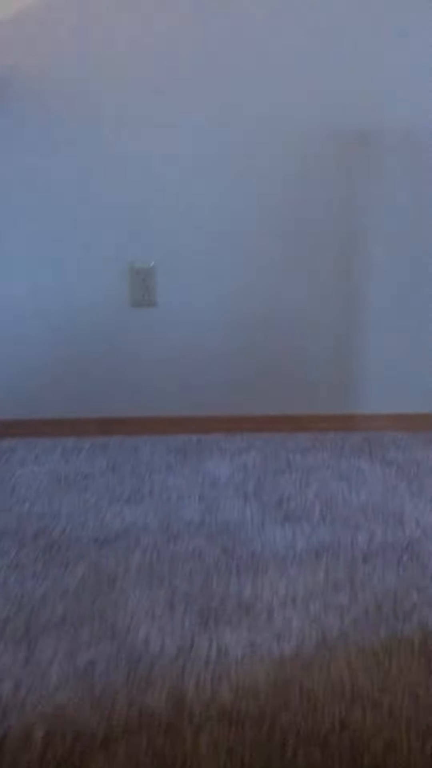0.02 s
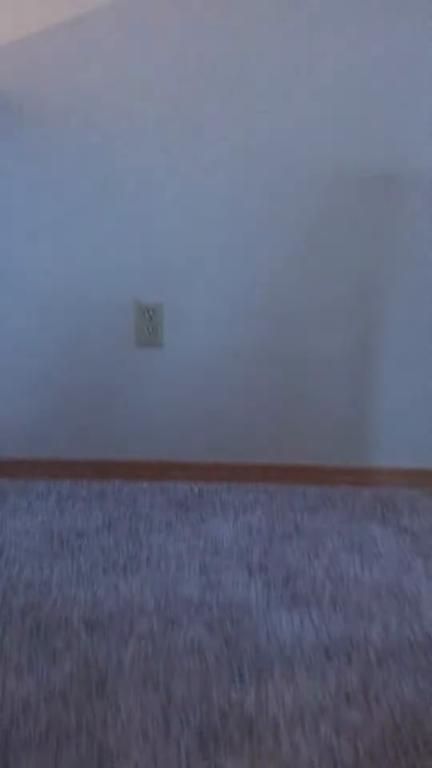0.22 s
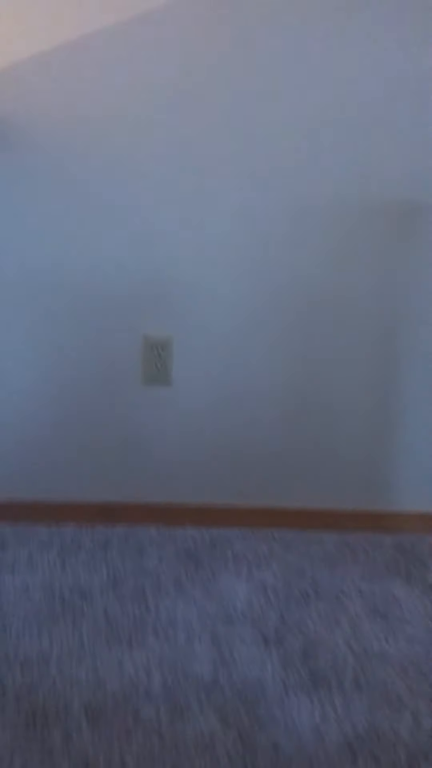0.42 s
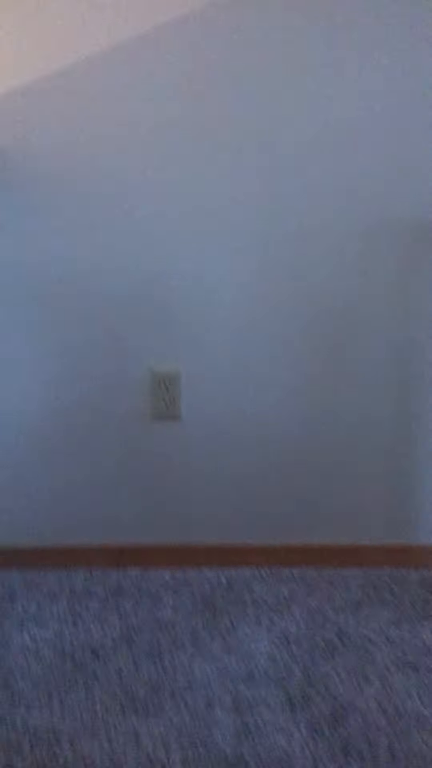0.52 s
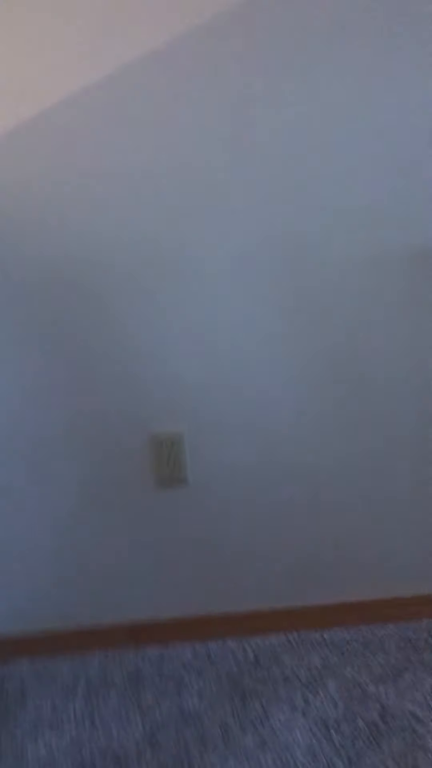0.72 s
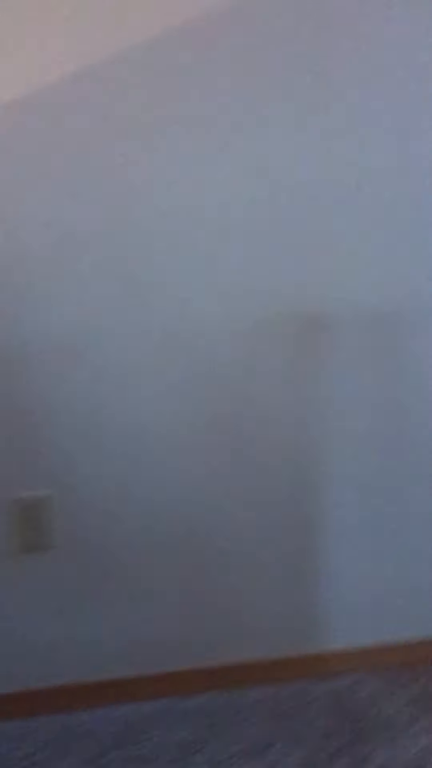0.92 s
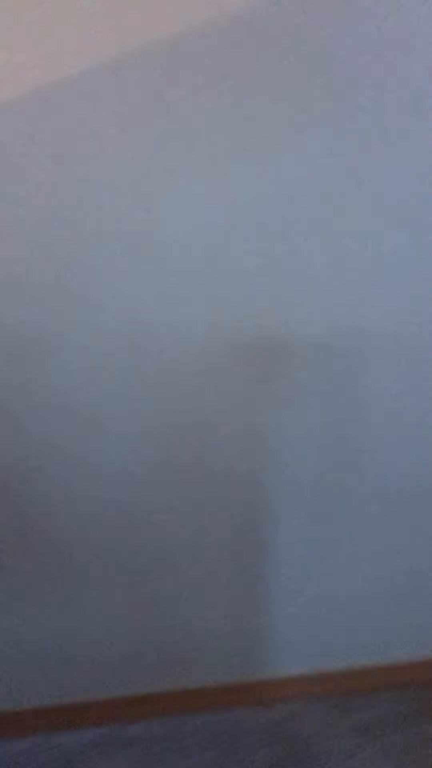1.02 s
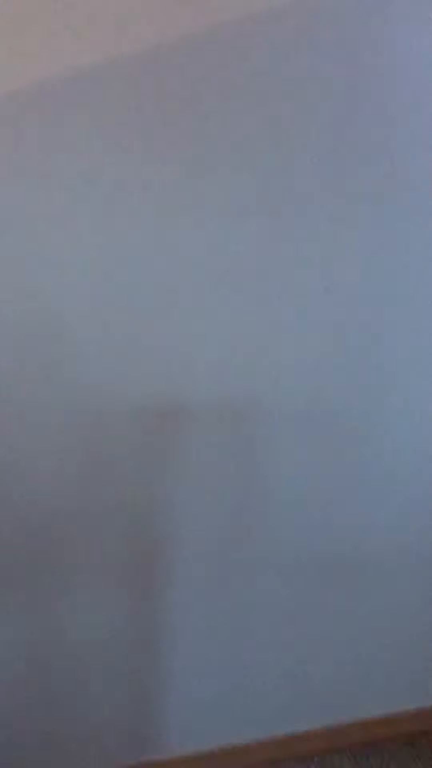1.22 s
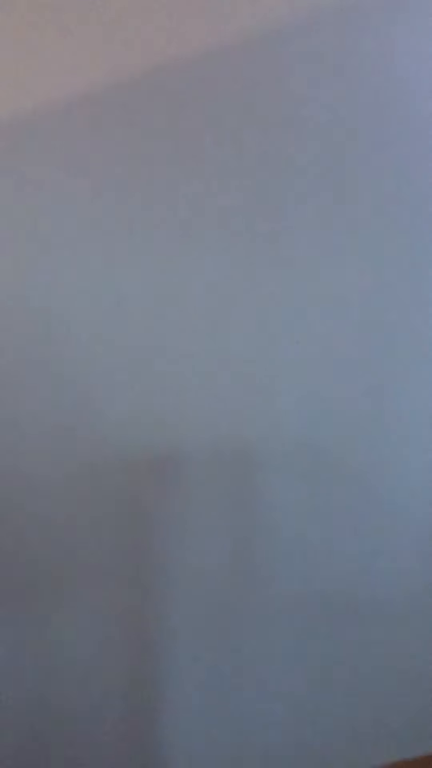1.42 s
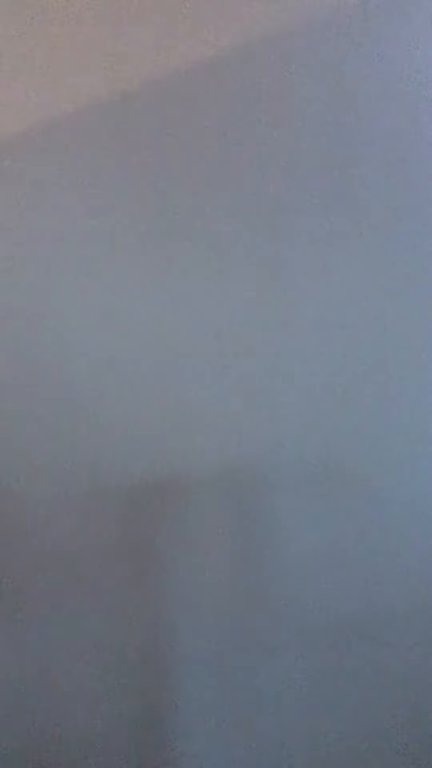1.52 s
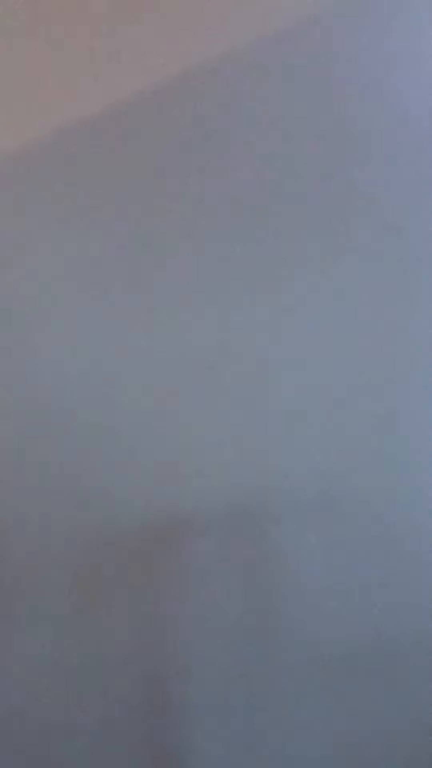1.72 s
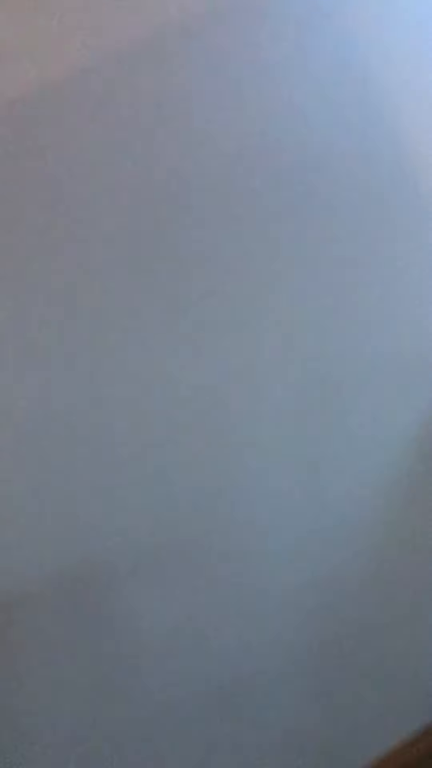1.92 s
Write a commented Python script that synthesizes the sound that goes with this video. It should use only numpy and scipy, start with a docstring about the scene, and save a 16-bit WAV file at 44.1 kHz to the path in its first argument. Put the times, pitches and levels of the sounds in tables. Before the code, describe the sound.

Four soft, dull footsteps on a carpeted wooden floor, with faint cloth rustle and small crackles.

```python
"""Quiet crackles, cloth rustle and a low house noise are heard first; then come four soft footfalls
on a carpeted wooden landing, close to the microphone. Each footfall swells damped board modes and leaves
a low shudder of noise; slaps on the pile are short knocks with brushes of noise. Soles and clothes tick
as noise bursts through resonances, weight shifts on the boards as low swings, and a small room answers."""
import sys
import numpy as np
from scipy import signal
from scipy.fft import rfft, irfft, next_fast_len
from scipy.io import wavfile
from scipy.ndimage import map_coordinates

SR = 44100
rng = np.random.default_rng(int(sys.argv[2]) if len(sys.argv) > 2 else 0)


def output_pcm(signal):
    """Save a mono or channel-first signal as 16-bit PCM at the path in sys.argv[1].

    Samples are clipped to [-1, 1] before scaling.
    """
    pcm = np.clip(np.atleast_2d(signal).T, -1, 1) * 32767
    wavfile.write(sys.argv[1], SR, np.round(pcm).astype(np.int16))


N = 88200
T = np.arange(N) / SR  # seconds


def amp(db):
    """Decibel law: a level in dB becomes an amplitude ratio."""
    return 10 ** (np.asarray(db) / 20)


def unit(x):
    """Normalisation by mean power: x scaled to rms 1."""
    return x / np.sqrt(np.mean(x ** 2) + 1e-20)


def along(points, hz):
    """Logarithmic frequency scale: (Hz, value) points joined by straight lines on it."""
    point_hz, value = np.transpose(points)
    return np.interp(np.log(hz + 1), np.log(point_hz + 1), value)


def filtered(x, response):
    """Linear filtering: the spectrum of x is multiplied by a response of frequency."""
    size = next_fast_len(len(x) + 8192)
    spectrum = rfft(x, size) * response(np.fft.rfftfreq(size, 1 / SR))
    return irfft(spectrum, size)[:len(x)]


def noise(spectrum):
    """Spectral shaping: white noise is coloured by (Hz, dB) points and set to rms 1."""
    points = [(5, -120)] + list(spectrum)
    return unit(filtered(rng.standard_normal(N), lambda hz: amp(along(points, hz))))


def wobble(rate):
    """Slow random modulation: a smooth curve through rate random knots a second."""
    knots = rng.standard_normal(int(N * rate / SR) + 4)
    return map_coordinates(knots, [T * rate])


def swell(start, rise, t60):
    """Build-up and decay: a smooth rise in seconds, then an exponential fall of 60 dB in t60 seconds."""
    u = np.clip(T - start, 0, None)
    attack = np.sin(np.pi / 2 * np.minimum(u / rise, 1)) ** 1.4
    return attack * amp(-60 * np.clip(u - rise, 0, None) / t60)


# Spectrum of the quiet house. Each row: frequency in Hz, relative density in dB per Hz.
HOUSE_SPECTRUM = [(13, -18), (22, 8), (143, -0.5), (222, -13), (418, -23), (480, -28), (981, -28),
                  (1070, -28), (2240, -29.5), (5260, -33.5), (14500, -40.5), (15800, -72)]


def house():
    """Stationary background noise: a steady random signal weighted towards low frequencies."""
    return amp(-54) * noise(HOUSE_SPECTRUM)


# Movement of cloth and pile. Each row: time in seconds, level in dB before the cloth trim.
CLOTH_LEVELS = [(0, -53), (.04, -58), (.13, -57.5), (.2, -71), (.4, -65.5), (.5, -63.5), (.6, -62.5),
                (.72, -61.5), (.8, -60), (.88, -55.5), (.96, -64), (1.1, -77), (1.2, -64.5), (1.3, -79),
                (1.4, -58), (1.47, -87), (1.58, -61.5), (1.7, -68), (1.8, -66), (1.9, -78), (2, -63)]
# Colour of the cloth. Each row: frequency in Hz, relative density in dB per Hz.
CLOTH_SPECTRUM = [(600, -26), (1500, -12.5), (3200, -3.5), (5000, -15.5), (7000, -9), (10000, -18)]
# A dull rush in the low middle. Each row: time in seconds, level in dB before its wobble.
RUSH_LEVELS = [(0, -56.5), (.06, -70), (.2, -64), (.36, -73), (.55, -68), (.72, -67.5), (.85, -69.5),
               (1.0, -73.5), (1.15, -70.5), (1.3, -64), (1.4, -88), (1.6, -75), (1.72, -66), (1.85, -63.5),
               (2, -68.5)]
# Colour of the dull rush. Each row: frequency in Hz, relative density in dB per Hz.
RUSH_SPECTRUM = [(120, -27), (200, -7.5), (260, -9.5), (335, -0.5), (450, -11), (900, -15), (1500, -13.5),
                 (2500, -33.5)]
CLOTH_TRIM_DB, GRAIN_DB = -7.5, 2


def rustle():
    """Amplitude modulation of noise: grainy cloth follows the movement, over a duller rush."""
    def level(rows):
        return amp(np.interp(T, *np.transpose(rows)))

    grain = amp(GRAIN_DB * wobble(160) + 2.3 * wobble(25.57))
    cloth = amp(CLOTH_TRIM_DB) * unit(grain * noise(CLOTH_SPECTRUM))
    rush = amp(2 * wobble(21)) * noise(RUSH_SPECTRUM)
    return level(CLOTH_LEVELS) * cloth + level(RUSH_LEVELS) * rush


# Small crackles of soles and clothes. Each row: start in seconds, level in dB before the length scaling,
# resonance in Hz, broad share in dB, bright share in dB (both against the resonance), decay constant in ms.
CRACKLES = [(0.045, -46, 3240, 0, -34, 6.3), (0.057, -47, 3220, -12, -30, 4.9),
            (.066, -47, 3180, 4, -22, 2.7), (0.085, -49, 3540, -5, -24, 1.7),
            (0.1073, -42.5, 2370, -2, -28, 1.6), (0.351, -36, 2900, 26, -3, 1.47),
            (.372, -47, 3660, 0, -12, 0.77), (0.4534, -39.5, 4100, 7, -38, 1.86),
            (0.502, -50, 2960, -17, -33, 1.1), (.563, -51, 2950, -14, -28, 3),
            (.585, -47.5, 3130, -15, -33, 3.1), (.592, -42, 3050, -13, -16, 2.1),
            (.599, -49, 2900, -4, -23, 1.4), (0.61, -42, 2050, -15, -28, 1.2),
            (.6215, -36.5, 4130, -7, -42, 3), (.630, -44, 3900, 12, -28, 1.2),
            (0.6366, -36.5, 5240, 2, -15, .9), (0.644, -48, 4500, -14, -13, 0.75),
            (.647, -59, 5300, -4, -30, 1.5), (0.801, -41.5, 3720, -9, 9, 2.1),
            (0.809, -37.5, 3720, 1, 13.5, 1.5), (0.858, -44, 3020, 11, -22, 3.7),
            (0.862, -42, 4500, 15, 19, 0.86), (.868, -44.5, 3520, -5, -31, 2.9),
            (0.875, -49.5, 3540, 1, -6, 3.1), (0.886, -38, 3660, -5, 25, 0.96),
            (0.895, -60, 3460, 3, -25, 2.4), (.905, -61, 3600, -9, 4, .7),
            (0.9411, -45.5, 2660, -8, -25, 2.3), (1.222, -50, 3960, 9, -18, 1.7),
            (1.226, -43, 3600, -5, 9, 1.3), (1.2545, -36, 1740, 10.5, 10, 1.6),
            (1.260, -37.5, 6040, 4, 8, 1.6), (1.2649, -50, 2900, -8, -5, 0.67),
            (1.275, -58, 3500, -15, -17, 3.3), (1.3447, -40.5, 4300, 3, -24, 1.7),
            (1.3504, -36, 6600, 6, 6, 1.53), (1.356, -52, 2420, 0, -5.5, 2.3),
            (1.411, -62, 3200, -17, -25, 4.6), (1.516, -53, 2740, -1, -28, 5.4),
            (1.523, -51.5, 2980, 5, -18, 2.5), (1.548, -46.5, 2340, -8, -28, 3.2),
            (1.5522, -37.5, 2300, 9, -22, .7), (1.560, -53.5, 2200, 0, -22, 6.3),
            (1.5638, -42, 2270, 3, -16, 2.1), (1.572, -65, 2080, -8, -28, 2.2),
            (1.619, -52, 3880, -9, -26, 1.1), (1.623, -44, 3550, -8, -22, .6),
            (1.809, -56.5, 4400, -22, -37, 3), (1.876, -58.5, 3250, -10, -30, 8.8),
            (1.889, -47, 3650, -23, 1.5, 9), (1.905, -51, 3440, -16, -34, 12),
            (1.919, -54, 3440, -6, -13, 6.2), (1.935, -64, 3700, -12, -30, 4.6),
            (1.969, -52, 2730, -9, -21, 3.4)]
TICK_Q, LOW_HZ, HIGH_HZ, BRIGHT_HZ = 2.82, 1200, 5560, 7400
TRAIL_DB, TRAIL_S, TRAIL_SHARE = -12, 0.007, 0.03  # fine grains that follow a crackle
TICK_RISE_MS, UNEVEN_DB = 0.2, 2  # soft edge; random colour of each crackle


def unit_energy(x):
    """Normalisation by energy: the squares of x sum to 1."""
    return x / np.linalg.norm(x)


def ticks():
    """Resonance excited by a transient: a dying noise burst, with a broad and a bright share."""
    out, t = np.zeros(N + 2048), np.arange(2048) / SR
    jf = 1j * np.fft.rfftfreq(len(t), 1 / SR)  # imaginary frequency in Hz
    broad = (jf / (LOW_HZ + jf)) ** 3 / (1 + jf / HIGH_HZ) ** 2
    bright = (jf / (BRIGHT_HZ + jf)) ** 4
    soft_edge = 1 - np.exp(-t * 1000 / TICK_RISE_MS)
    draws = rng.standard_normal((len(CRACKLES), 3, len(t)))
    for (s, db, hz, broad_db, bright_db, ms), (grit, grain, colour) in zip(CRACKLES, draws):
        # only the strongest few grains sound in the trail
        sparse = np.abs(grain) > np.quantile(np.abs(grain), 1 - TRAIL_SHARE)
        trail = amp(TRAIL_DB) * np.exp(-t / TRAIL_S) * sparse / np.sqrt(TRAIL_SHARE)
        decay = np.exp(-t * 1000 / max(ms, 0.1))
        burst = rfft(grit * (decay + trail) * soft_edge)
        burst = burst * amp(UNEVEN_DB * map_coordinates(colour, [jf.imag / 900]))  # a knot each 900 Hz
        damping = jf * hz / TICK_Q
        peak = (damping / (hz * hz + jf * jf + damping)) ** 2
        ring, wide, crisp = [unit_energy(irfft(burst * h)) for h in (peak, broad, bright)]
        crackle = unit_energy(ring + amp(broad_db) * wide + amp(bright_db) * crisp)
        # energy grows with length, so that the level does not depend on it
        out[round(s * SR):][:len(t)] += amp(db) * np.sqrt(ms * SR / 8000) * crackle
    return out[:N]


# Sole slapping the pile. Each row: knock centre in seconds, knock peak in dB, knock frequency in Hz,
# dull scuff in dB and bright brush in dB (both before their wobble), brush t60 in seconds.
PILE_SLAPS = [(0.2441, -29, 1280, -48, -53.5, 0.097), (0.664, -41.5, 1250, -53, -59.5, 0.11),
              (1.147, -49.5, 1130, -54, -61, 0.09), (1.183, -46.5, 1340, -60.5, -85, 0.041),
              (1.662, -67, 1400, -56.5, -66, 0.15)]
# Colour of the dull scuff. Each row: frequency in Hz, relative density in dB per Hz.
SCUFF_SPECTRUM = [(250, -23), (400, -6.5), (650, -3), (1100, -6), (1600, -5), (2300, -16), (4000, -15)]
# Colour of the bright brush. Each row: frequency in Hz, relative density in dB per Hz.
BRUSH_SPECTRUM = [(1000, -25), (2000, 8), (3500, 3), (6000, -2), (9000, -7.5), (15800, -17)]
SLAP_S, BRUSH_LEAD_S = 0.00088, 0.01


def slaps():
    """Impact and friction: a knock of about two cycles, and fibre noise around it, dull and bright."""
    knock, scuff_level, brush_level = np.zeros(N), np.zeros(N), np.zeros(N)
    for s, db, hz, scuff_db, brush_db, t60 in PILE_SLAPS:
        bell_db = -6.8 * ((T - s) / SLAP_S) ** 2
        knock += amp(db + bell_db) * np.cos(2 * np.pi * hz * (T - s))
        shape = swell(s - BRUSH_LEAD_S, BRUSH_LEAD_S, t60)
        scuff_level += amp(scuff_db) * shape
        brush_level += amp(brush_db) * shape
    scuff = scuff_level * amp(5.6 * wobble(250)) * noise(SCUFF_SPECTRUM)
    brush = brush_level * amp(5.6 * wobble(250)) * noise(BRUSH_SPECTRUM)
    return knock, scuff + brush


# Weight rolling and shifting on the boards. Each row: start in seconds, level in dB, frequency in Hz.
WEIGHT_SWAYS = [(0.033, -36, 47), (0.088, -41, 72.6), (.268, -26.5, 54), (0.384, -32, 39.8),
                (0.457, -38.5, 40.7), (0.523, -42, 51), (.66, -30, 125), (0.711, -34, 50.7),
                (0.769, -32.5, 62), (0.828, -35, 75.6), (0.889, -37, 47.2), (0.963, -43, 50.5),
                (1.222, -38, 81.7), (1.25, -43.5, 45), (1.308, -42.5, 60.5), (1.682, -47, 52),
                (1.742, -45, 54), (1.792, -47, 58.4), (1.845, -46.5, 53.5), (1.888, -50, 48.6)]
SWAY_CYCLES = 1.72


def sways():
    """Quasi-static loading: each shift of weight is one low swing under a smooth window."""
    out = np.zeros(N)
    for s, db, hz in WEIGHT_SWAYS:
        u = np.clip((T - s) * hz / SWAY_CYCLES, 0, 1)
        out -= amp(db) * np.sin(np.pi * u) ** 2 * np.sin(2 * np.pi * hz * (T - s))
    return out


# Floor modes. Each row: frequency in Hz, t60 in seconds.
BOARD_MODES = [(50, 0.41), (82, 0.1), (108, 0.28), (131, 0.13), (151, 0.35), (178, 0.21), (212, 0.18),
               (252, 0.213), (345, 0.088), (420, 0.092)]
# Footfalls. Each row: start in seconds, swell in cycles at the swell frequency, shudder in dB,
# then for each board mode at that spot its level in dB before the foot settles.
FOOTFALLS = [(.232, 2.74, -33, -30.5, -29.5, -25.5, -28, -42, -37, -35, -36.5, -52.5, -52),
             (0.653, 4.9, -36.5, -53, -58, -37, -29.5, -26.5, -30.5, -43.5, -49.5, -50, -55),
             (1.136, 3.73, -48, -48.5, -38, -50.5, -39.5, -39.5, -41.5, -45, -53.5, -56, -54),
             (1.654, 2.6, -40, -46, -52, -46, -55, -46.5, -50, -39, -41.5, -48, -56)]
# Colour of the shudder. Each row: frequency in Hz, relative density in dB per Hz.
SHUDDER_SPECTRUM = [(13, -61), (22, 28), (48, 9.5), (139, 2), (330, -17.5), (607, -37), (1200, -21.5),
                    (1500, -54.5), (1800, -27), (2340, -98), (3960, -120)]
SWELL_HZ, SWELL_LAW = 140, 0.83  # lower modes take longer to swell
SHUDDER_RISE_S, SHUDDER_T60 = 0.049, 0.8  # seconds
SETTLE_DB, SETTLE_S, RAGGED_DB = -4.5, 0.014, 3.5  # the settling foot damps the ring, which then wavers


def boards():
    """Modal superposition: the soft foot swells each damped mode; a rumbling shudder follows."""
    ring, shudder_level = np.zeros(N), np.zeros(N)
    for s, cycles, shudder_db, *levels in FOOTFALLS:
        for (hz, t60), db in zip(BOARD_MODES, levels):
            rise = cycles / SWELL_HZ * (SWELL_HZ / hz) ** SWELL_LAW
            settled = np.clip((T - s - rise) / SETTLE_S, 0, 1)
            level = amp(db + settled * (SETTLE_DB + RAGGED_DB * wobble(30.07)))
            ring += level * swell(s, rise, t60) * np.sin(2 * np.pi * hz * (T - s))
        shudder_level += amp(shudder_db) * swell(s, SHUDDER_RISE_S, SHUDDER_T60)
    return ring + shudder_level * noise(SHUDDER_SPECTRUM)


# Decay of the small room. Each row: frequency in Hz, t60 in seconds.
ROOM_DECAY = [(300, 0.82), (2000, 0.19), (10000, 0.19)]
WALL_S = 0.006  # delay before the room answers


def room(x):
    """Reverberation: a diffuse noise tail in which each frequency dies at its own speed."""
    hz, t, cells = signal.stft(rng.standard_normal(SR // 2), SR, nperseg=256)
    decay = amp(-60 * t / along(ROOM_DECAY, hz)[:, None])
    tail = signal.istft(cells * decay, SR, nperseg=256)[1]
    delayed = np.pad(x, (round(WALL_S * SR), 0))
    return signal.fftconvolve(delayed, unit_energy(tail))[:N]


def scene():
    """Superposition: all sources add, and the room answers the knocks, brushes and crackles."""
    knock, brush = slaps()
    crackle = brush + ticks()
    wet = room(amp(-6.5) * crackle + amp(-14) * knock)
    return (house() + rustle() + wet + crackle + knock + sways() + boards())[None]


# Colour of the microphone. Each row: frequency in Hz, gain in dB.
MIC_RESPONSE = [(15, -13), (30, -4.5), (50, 3), (6000, 0), (7600, -5), (9000, -1), (10400, -9),
                (12000, -5.5), (14700, -6.5), (15800, -13)]
# Steady hiss of the microphone. Each row: frequency in Hz, relative density in dB per Hz.
HISS_SPECTRUM = [(1500, -32), (4000, -10), (8000, -5), (12000, -1.5), (15800, -2.5)]
HISS_DB, TOP_HZ = -77, 15900


def record(dry):
    """Transducer response and self-noise: colour, then hiss; nothing is kept above the band limit."""
    coloured = filtered(dry[0], lambda hz: amp(along(MIC_RESPONSE, hz)))
    hissing = coloured + amp(HISS_DB) * noise(HISS_SPECTRUM)
    return filtered(hissing, lambda hz: hz < TOP_HZ)[None]


dry = scene()
out = record(dry)
output_pcm(out)
```